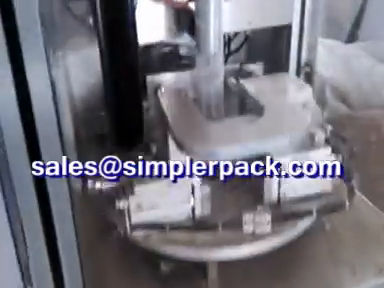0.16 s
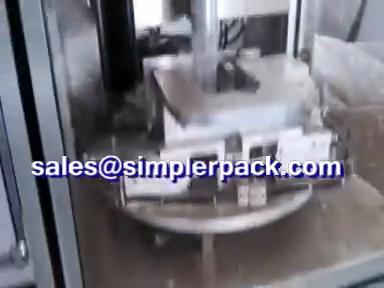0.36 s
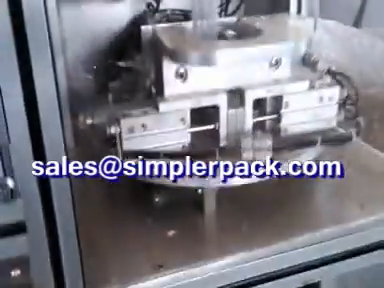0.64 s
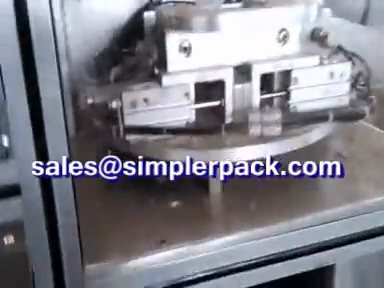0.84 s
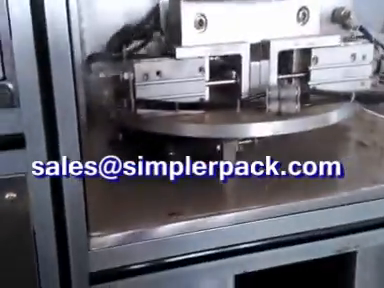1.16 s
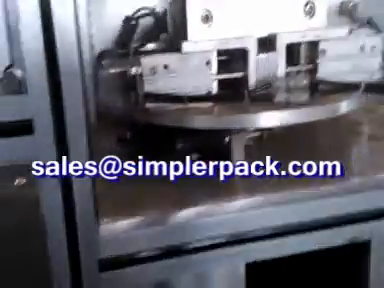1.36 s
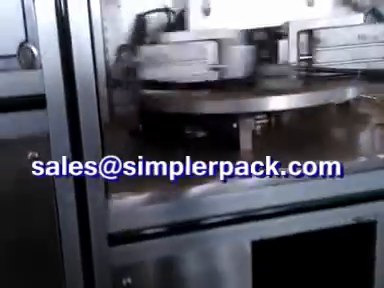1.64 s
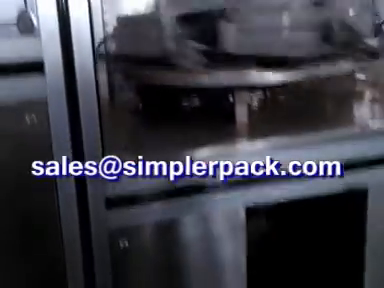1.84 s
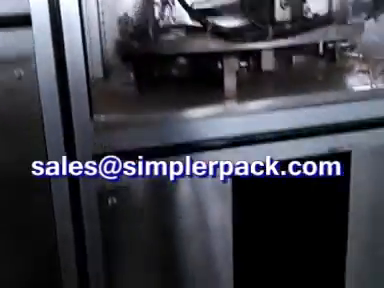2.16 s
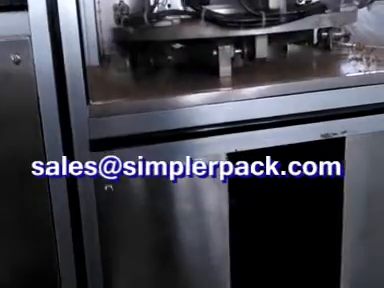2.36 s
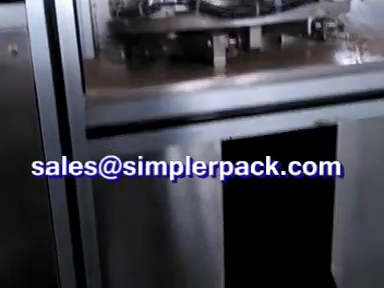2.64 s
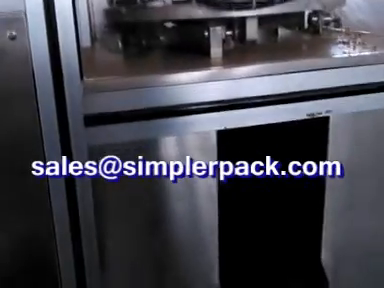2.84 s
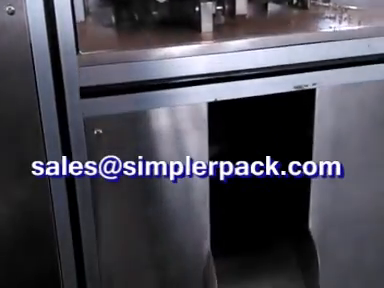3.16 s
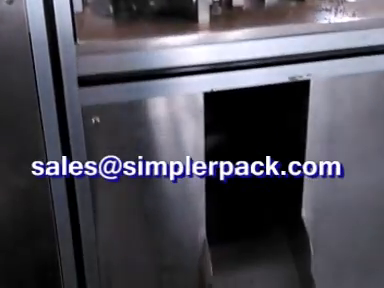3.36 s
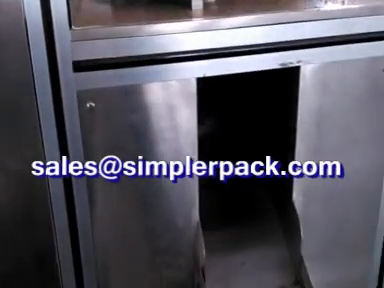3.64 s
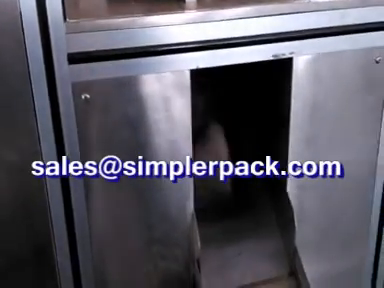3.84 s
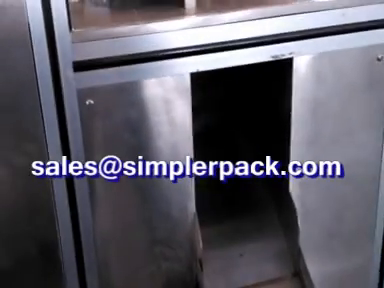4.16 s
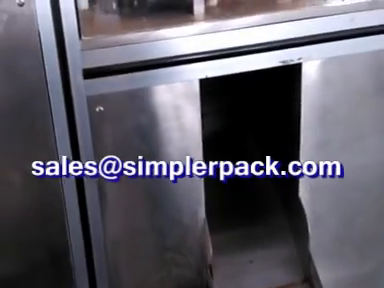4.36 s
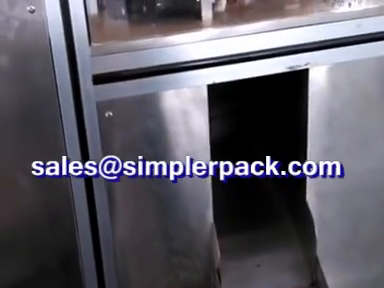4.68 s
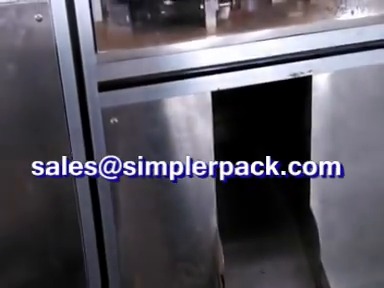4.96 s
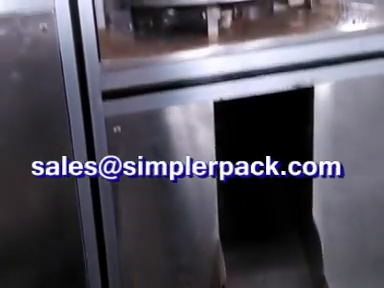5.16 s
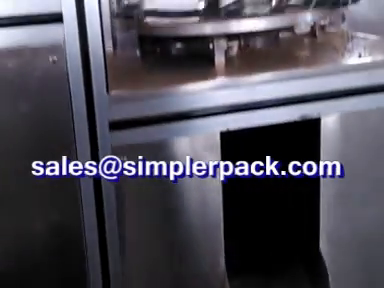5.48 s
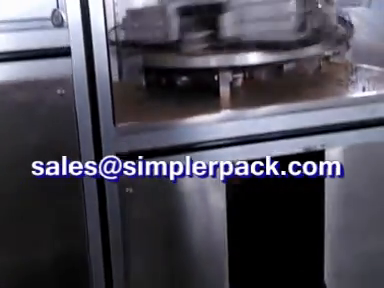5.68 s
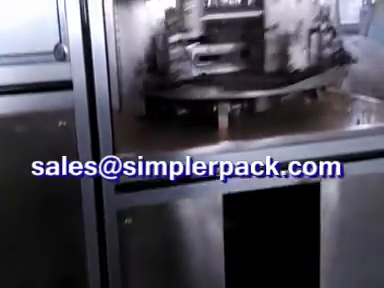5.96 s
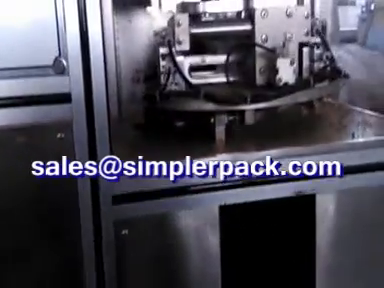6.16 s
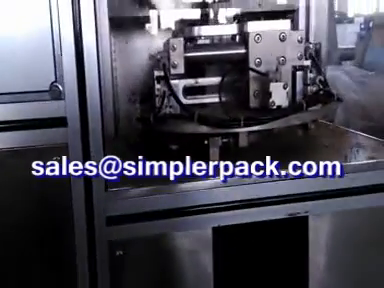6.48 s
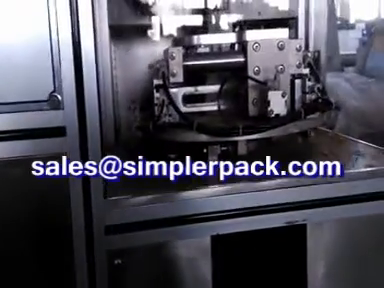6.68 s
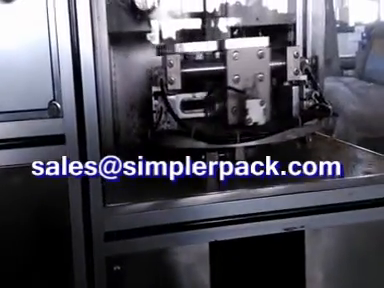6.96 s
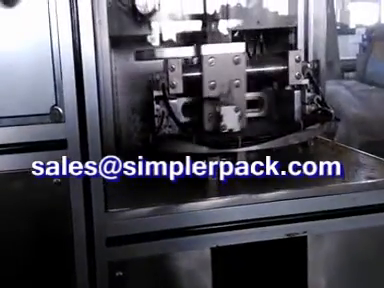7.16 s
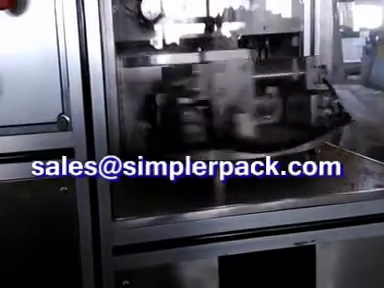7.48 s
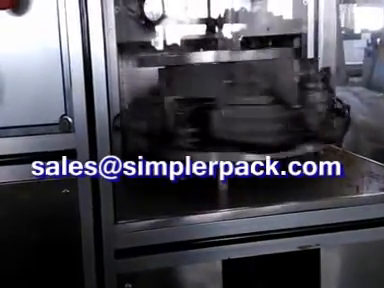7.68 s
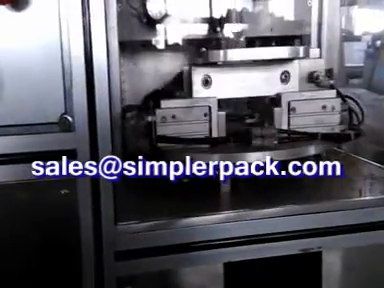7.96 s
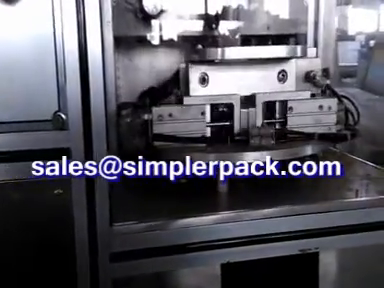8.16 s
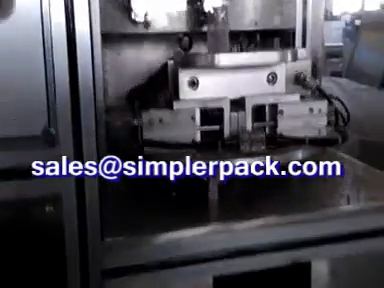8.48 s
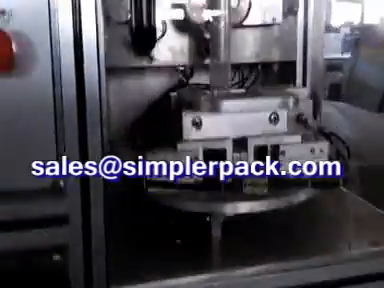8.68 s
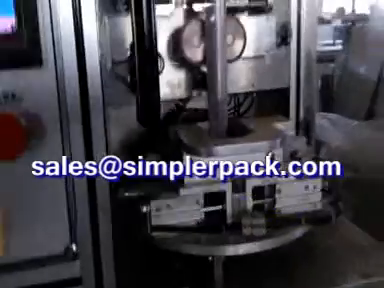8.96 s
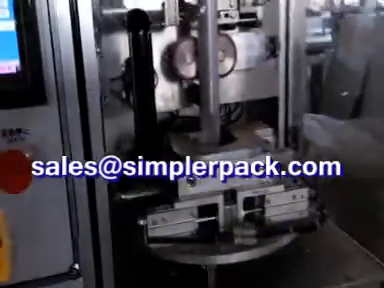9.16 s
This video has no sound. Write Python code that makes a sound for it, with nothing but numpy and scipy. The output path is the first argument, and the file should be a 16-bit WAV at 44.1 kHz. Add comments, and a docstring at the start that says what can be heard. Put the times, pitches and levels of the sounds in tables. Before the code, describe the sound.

Close to a packing machine on a factory floor, leaking air hisses steadily with a wavering high whistle. About every two seconds the pneumatic drive blasts air in spurts while its housing rattles and whines, then the exhaust dumps with a low puff, usually followed by a sharp latch click. The metal frame knocks and now and then squeals thinly. Moving air buffets the phone microphone throughout.

```python
"""A hissing, whistling air leak, close to a phone microphone at a packing machine on a factory floor.
Moving air buffets the microphone in low puffs and sets the cabinet humming. Every two seconds the
pneumatic drive runs: air blasts in spurts, the housing rattles and whines, then the exhaust dumps,
most times with a latch click. The frame knocks as the cylinders stop; now and then comes a thin squeal."""
import sys
import numpy as np
from scipy import signal
from scipy.fft import rfft, irfft, next_fast_len
from scipy.io import wavfile
from scipy.ndimage import uniform_filter1d

SR = 44100
rng = np.random.default_rng(int(sys.argv[2]) if len(sys.argv) > 2 else 0)


def generate_wav(signal):
    """Clip the signal to [-1, 1] and save it as 16-bit WAV at the path in sys.argv[1]."""
    frames = np.transpose(np.atleast_2d(signal))
    scaled = np.clip(frames, -1, 1) * 32767
    pcm = np.round(scaled).astype(np.int16)
    wavfile.write(sys.argv[1], SR, pcm)


N = 411440


def from_db(db):
    """Gain of a level in dB."""
    return 10 ** (np.asarray(db) / 20)


def rms_one(x):
    """x scaled to rms 1."""
    return x / np.sqrt(np.mean(x ** 2) + 1e-20)


def in_time(rows):
    """A curve of (seconds, value) rows, one value a sample."""
    return np.interp(np.arange(N) / SR, *np.transpose(rows))


def colour(x, points):
    """x filtered by a spectrum of (Hz, dB) points."""
    hz, level_db = np.transpose(points)
    size = next_fast_len(N)
    log_hz = np.log(np.maximum(np.fft.rfftfreq(size, 1 / SR), 1))
    gain = from_db(np.interp(log_hz, np.log(hz), level_db))
    return irfft(rfft(x, size) * gain, size)[:N]


def drift(rate_hz):
    """Random wander of spread 1: noise twice through a one-pole low-pass."""
    r = np.exp(-16 * np.pi * rate_hz / SR)
    slow = signal.lfilter([1], [1, -2 * r, r * r], rng.standard_normal(N // 8 + 4002))[4000:]
    return np.interp(np.arange(N) / 8, np.arange(len(slow)), rms_one(slow))


def resonate(x, peaks):
    """x through parallel resonances of alternating sign, scaled to rms 1."""
    out = np.zeros(len(x))
    for k, (hz, width, level_db) in enumerate(peaks):
        r = np.exp(-np.pi * width / SR)
        poles = [1, -2 * r * np.cos(2 * np.pi * hz / SR), r * r]
        ring = signal.lfilter([1 - r * r, 0, r * r - 1], poles, x)
        out += (-1) ** k * from_db(level_db) * ring / np.sqrt(width)
    return rms_one(out)


def add(track, start, sound):
    """Mixes a short sound in at a start in seconds."""
    i = max(round(start * SR), 0)
    track[i:i + len(sound)] += sound[:N - i]


def burst(length, edge):
    """A flat envelope with a quick rise and a fading end."""
    t = np.arange(round((length + 5 * edge) * SR)) / SR
    return (1 - np.exp(-t / (0.19 * edge))) * np.exp(-np.maximum(t - length, 0) / edge)


def peaked(phase):
    """A wave with pointed crests, as of a flap of air."""
    return 0.62 * np.cos(phase) + 0.12 * np.cos(2 * phase) + 0.035 * np.cos(3 * phase)


def rough_ring(length, hz, width_hz):
    """The envelope of a short burst, and as much noise rung twice through one sharp resonance."""
    envelope = burst(length, 0.0011 + 0.47 * length)
    peak = [(hz, width_hz, 0)]
    noise = rng.standard_normal(len(envelope) + 2000)
    return envelope, resonate(resonate(noise, peak), peak)[2000:]


# The leak's edge tone, close by. Each row: time in seconds, centre pitch in Hz.
WHISTLE_PITCH = [(0.0, 2540), (0.15, 2440), (0.33, 2680), (0.47, 2400), (0.72, 2430), (0.84, 2600),
                 (0.93, 2380), (1.09, 2680), (1.45, 2710), (1.75, 2650), (2.33, 2715), (2.95, 2420),
                 (3.1, 2540), (3.27, 2600), (3.55, 2590), (3.8, 2530), (3.93, 2370), (4.14, 2540),
                 (4.34, 2460), (4.75, 2400), (5.0, 2540), (5.5, 2530), (6.15, 2640), (6.31, 2400),
                 (6.75, 2450), (6.83, 2360), (6.95, 2470), (7.15, 2615), (7.9, 2460), (8.1, 2680),
                 (8.26, 2460), (8.91, 2550), (9.33, 2460)]
# Its second edge tone. The row: pitch in Hz, width in Hz, relative level in dB.
UPPER_WHISTLE = [(5860, 55, 0)]
# Breaks in the whistle. Each row: start in seconds, length in seconds.
WHISTLE_GAPS = [(2.265, 0.027), (2.978, 0.028), (3.542, 0.017), (4.189, 0.114), (4.932, 0.0097),
                (5.125, 0.081), (5.225, 0.017), (5.231, 0.011), (5.354, 0.0079), (5.393, 0.0097),
                (5.442, 0.012), (5.492, 0.018), (5.542, 0.024), (6.107, 0.013), (6.149, 0.017),
                (6.187, 0.016), (6.874, 0.035), (6.965, 0.0077), (7.01, 0.022), (7.048, 0.01),
                (7.511, 0.012), (7.548, 0.015), (8.047, 0.014), (8.13, 0.021), (8.72, 0.018),
                (8.846, 0.007), (9.005, 0.018)]
# The leak's hiss. Each row: frequency in Hz, relative density in dB.
HISS_SPECTRUM = [(40, -27), (100, -38), (250, -39), (500, -21.5), (850, -17), (1300, -14.5), (2200, -11),
                 (3100, -12), (5000, -12), (5850, -11.5), (7000, -12.5), (7600, -18), (8200, -14.5)]

def leak(blast, low_air, hiss_db=-29.5, whistle_db=-37, upper_db=-48):
    """Escaping air hisses and sounds two edge tones, which waver and break off now and then."""
    broken = np.zeros(N)
    for start, length in WHISTLE_GAPS:
        add(broken, start, np.ones(round(length * SR)))
    sag_db = -6 * uniform_filter1d(np.minimum(broken, 1), size=700)
    starved = blast / (blast + from_db(-34))   # blasts starve the leak: its tone stutters
    broken += drift(25) < 1.8 * starved - 2.2
    shaken = uniform_filter1d(np.abs(low_air), size=1500) / from_db(-24)
    broken += drift(40) < shaken - 2.2   # strong buffeting breaks it up too
    sounding = uniform_filter1d(1 - 0.9 * np.minimum(broken, 1), size=200)
    stirred = np.minimum(uniform_filter1d(np.abs(low_air), size=5000) / from_db(-37), 1)
    waver_hz = (18 + 30 * stirred) * drift(30) + (38 + 40 * stirred - 15 * starved) * drift(120)
    tone = np.sqrt(2) * np.sin(2 * np.pi * np.cumsum(in_time(WHISTLE_PITCH) + waver_hz) / SR)
    whistle = from_db(whistle_db + drift(68)) * tone
    upper = from_db(upper_db + 2 * drift(9.6)) * resonate(rng.standard_normal(N), UPPER_WHISTLE)
    hiss = rms_one(colour(rng.standard_normal(N), HISS_SPECTRUM))
    return sounding * (whistle + upper) + from_db(hiss_db + sag_db + 1.13 * drift(60)) * hiss


# Moving air at the microphone. Each row: time in seconds, level in dB.
DRAUGHT = [(0.0, -45.5), (0.41, -42.5), (0.85, -53.5), (1.3, -54.5), (1.4, -62.5), (1.74, -61),
           (1.9, -35.5), (2.15, -48.5), (2.38, -26.5), (2.47, -43.5), (2.65, -44.5), (3.0, -44.5),
           (3.1, -45), (3.29, -49.5), (3.35, -64), (3.45, -72.5), (3.48, -46), (3.8, -36.5), (4.15, -36),
           (4.3, -42), (4.75, -46), (4.8, -57.5), (5.05, -66), (5.5, -51), (5.85, -45.5), (6.02, -57),
           (6.2, -38.5), (6.6, -54.5), (6.76, -60), (6.97, -46), (7.15, -59.5), (7.36, -58), (7.42, -48),
           (7.8, -48), (8.2, -45), (8.9, -49.5), (9.33, -58.5)]
# The exhaust dump after each run. Each row: time of its peak in seconds, level in dB.
EXHAUSTS = [(0.99, -19), (3.039, -36), (4.909, -19.5), (6.872, -19.5), (8.809, -21)]
# Turbulence on the microphone. Each row: frequency in Hz, relative density in dB.
BUFFET_SPECTRUM = [(30, -40), (60, -7), (100, -2.5), (160, -2), (260, -18), (500, -32.5)]
# The frame's resonances. Each row: frequency in Hz, width in Hz, relative level in dB.
FRAME_MODES = [(231, 137, 8), (506, 186, 5.5), (743, 140, -2.5)]

def buffeting(running, idle_db=-52.5, run_db=-48.5, rise_s=0.02, fall_s=0.038, settle_s=0.13):
    """Draught and exhaust buffet the microphone, with puffs, frame rumble and the cabinet's answer."""
    t = np.arange(N) / SR
    wind = draught = from_db(in_time(DRAUGHT))
    shaking = from_db(idle_db) + from_db(run_db) * running
    for peak_s, level_db in EXHAUSTS:
        rising = (t - peak_s) / rise_s
        wind = wind + from_db(level_db) * np.exp(np.minimum(rising, (peak_s - t) / fall_s))
        shaking += from_db(level_db - 18) * np.exp(np.minimum(rising, (peak_s - t) / settle_s))
    lumps = from_db(2.6 * drift(20))
    buffet = rms_one(colour(lumps * rng.standard_normal(N), BUFFET_SPECTRUM))
    rumble = rms_one(lumps * from_db(2.5 * drift(45)) * resonate(rng.standard_normal(N), FRAME_MODES))
    pushes = wind * buffet + (shaking + from_db(-17) * wind) * rumble + puffs()
    return pushes + cabinet(draught, buffet, pushes)


# The cabinet's resonance. The row: frequency in Hz, width in Hz, relative level in dB.
CABINET_MODE = [(95.4, 12, 0)]
# Moments of steady hum. Each row: start in seconds, length in seconds, level in dB.
STEADY_HUMS = [(3.079, .22, -38), (3.47, .07, -34)]

def cabinet(draught, buffet, pushes, blown_db=-6.5, boom_db=-47.5, steady_hz=98):
    """The cabinet hums in the draught, twice holds a steady note, and booms along with low pushes."""
    hum = from_db(blown_db) * draught * resonate(buffet, CABINET_MODE)
    for start, length, level_db in STEADY_HUMS:
        swell = from_db(level_db) * burst(length, .012)
        add(hum, start, swell * 2 * peaked(2 * np.pi * steady_hz * np.arange(len(swell)) / SR))
    return hum + from_db(boom_db) * resonate(pushes, CABINET_MODE)


# Low puffs right on the microphone. Each row: start in seconds, level in dB, pitch in Hz.
PUFFS = [(0.039, -27, 104.5), (0.116, -24, 168), (0.36, -24, 123.3), (0.617, -20, 110), (0.669, -25, 188),
         (0.921, -16, 105), (0.961, -14, 193.4), (0.994, -9.5, 154.5), (1.017, -9.5, 151),
         (1.036, -7, 178.7), (1.136, -25.5, 263), (1.218, -25.5, 98.6), (1.301, -18.5, 100.5),
         (1.717, -31, 106), (1.809, -17.5, 102.8), (1.895, -14.5, 128), (1.96, -17.5, 94),
         (2.003, -17.5, 90), (2.073, -19, 128.5), (2.106, -14.5, 97.1), (2.214, -24.5, 98.6),
         (2.258, -5.5, 178.4), (2.323, -6.5, 112.5), (2.494, -16.5, 248), (2.546, -17, 96),
         (2.938, -14, 159), (3.004, -15.5, 131.6), (3.023, -17.5, 182.6), (3.047, -8, 109.6),
         (3.543, -11.5, 106.7), (3.665, -16.5, 109), (3.688, -19, 109), (3.807, -7.5, 147),
         (3.901, -15.5, 155.3), (3.939, -8.5, 108.7), (3.986, -12, 109.5), (4.164, -5.5, 112.2),
         (4.386, -22.5, 201.5), (4.881, -14.5, 225), (4.895, -6.5, 130), (4.922, -12, 138.4),
         (5.286, -26, 211.5), (5.773, -15.5, 120.5), (5.801, -17.5, 148.3), (5.87, -30, 151.5),
         (6.031, -26, 204), (6.058, -21, 105.6), (6.303, -17.5, 126), (6.79, -22, 123), (6.834, -20.5, 101),
         (6.87, -7, 136), (6.908, -16, 192), (7.377, -17.5, 96.2), (7.4, -25, 134.3), (7.523, -23, 121.4),
         (7.657, -26.5, 106.8), (7.856, -12, 109.3), (7.89, -24, 90), (8.439, -28.5, 140),
         (8.722, -14.5, 110), (8.753, -12, 104), (8.796, -13, 115.3), (8.834, -12.5, 110.4),
         (9.0, -26.5, 212), (9.285, -29, 132)]

def puffs():
    """Single flaps of air, each swelling and dying within a few cycles."""
    t, out = np.arange(round(.09 * SR)) / SR, np.zeros(N)
    for start, level_db, hz in PUFFS:
        rise_s = 0.0067 + 0.26 / hz   # lower puffs swell more slowly
        swell = t / rise_s * np.exp(1 - t / rise_s)
        flap = peaked(2 * np.pi * hz * t + rng.uniform(0, 2 * np.pi))
        add(out, start, from_db(level_db) * swell ** 2.9 * flap)
    return out


# Clunks in the frame. Each row: start in seconds, length in seconds, level in dB, ring pitch in Hz,
# the ring's share from 0 to 1.
CLUNKS = [(0.213, 0.011, -20, 590, 1), (0.234, 0.043, -23.5, 670, 0.45), (.427, 0.018, -24, 413, 0.88),
          (1.898, 0.021, -24, 281, 1), (2.258, 0.023, -14, 290, 0.34), (2.4, 0.027, -30, 278, 0.8),
          (2.55, 0.02, -29, 600, 0.5), (2.74, 0.069, -35.5, 527, 0.72), (2.943, 0.0082, -22, 625, .4),
          (4.184, 0.062, -21.5, 297, .4), (4.29, 0.13, -35.5, 506, 0.88), (4.84, 0.015, -30.5, 510, 1),
          (5.776, 0.023, -34, 353, 0.4), (6.11, 0.051, -23.5, 770, 0.37), (6.19, 0.03, -25.5, 500, 0.67),
          (6.68, 0.011, -33.5, 456, 0.96), (6.88, 0.0046, -15, 337, 0.95), (6.95, 0.012, -28.5, 384, 0.34),
          (7.52, 0.041, -39.5, 382, 0.57), (8.041, 0.023, -27, 685, 0.4), (8.124, 0.041, -27.5, 497, 0.66),
          (8.219, 0.025, -25, 462, 0.9), (8.27, 0.064, -33, 472, 0.89), (8.695, 0.04, -22.5, 752, 0.96)]
# The knock under each ring. Each row: frequency in Hz, relative density in dB.
KNOCK_SPECTRUM = [(80, -24), (200, 2), (500, -6.5), (900, -15), (1800, -27.5), (3000, -46.5)]

def frame_clunks():
    """A stopping cylinder strikes the frame: a broad knock with one rough ring."""
    knocking, out = colour(rng.standard_normal(N), KNOCK_SPECTRUM), np.zeros(N)
    for start, length, level_db, hz, share in CLUNKS:
        envelope, ring = rough_ring(length, hz, width_hz=84)
        knock = rms_one(knocking[round(start * SR):][:len(envelope)])
        add(out, start, from_db(level_db) * envelope * (share * ring + np.sqrt(1 - share ** 2) * knock))
    return out


# The drive's runs. Each row: start in seconds, length in seconds, lift of the blast's body in dB.
RUNS = [(0.36, 0.55, 2), (2.374, 0.61, 1.5), (4.29, 0.69, 1), (6.216, .6, -1.5), (8.135, 0.64, 0.5)]
# Spurts of air from the drive. Each row: start in seconds, length in seconds, blast level in dB.
SPURTS = [(0.395, 0.065, -30), (0.493, 0.04, -36.5), (0.59, 0.011, -25.5), (0.623, 0.021, -27.5),
          (0.677, 0.015, -33), (0.729, 0.091, -24), (0.832, 0.015, -32.5), (0.895, 0.018, -30.5),
          (2.404, 0.0038, -24.5), (2.494, 0.021, -22.5), (2.55, 0.022, -24.5), (2.662, 0.0094, -24),
          (2.737, 0.027, -38.5), (2.765, 0.035, -21), (2.807, 0.057, -24), (2.858, 0.058, -27),
          (2.937, 0.0067, -29), (4.304, 0.064, -20.5), (4.406, 0.055, -25), (4.469, 0.034, -23),
          (4.533, 0.019, -31), (4.565, 0.044, -23.5), (4.624, 0.051, -23.5), (4.689, 0.088, -28),
          (4.812, 0.037, -24), (6.217, 0.016, -28.5), (6.25, 0.11, -24), (6.354, 0.034, -21.5),
          (6.391, 0.03, -28.5), (6.457, 0.013, -27), (6.54, 0.064, -23.5), (6.629, 0.037, -27),
          (6.679, 0.015, -21), (6.711, 0.0098, -20), (6.797, 0.015, -25), (8.146, 0.057, -22),
          (8.212, 0.04, -17), (8.262, 0.071, -25.5), (8.332, 0.027, -23), (8.522, 0.0087, -28.5),
          (8.59, 0.028, -26), (8.695, 0.042, -27)]

def drive_cycle(run_blast_db=-32, run_rattle_db=-42.5, rattle_follows=0.23):
    """Envelopes of the drive: each run blows and rattles steadily, and spurts add to both."""
    running, body_db, blast, rattle = np.zeros((4, N))
    for start, length, lift_db in RUNS:
        add(running, start, burst(length, 0.0079))
        add(body_db, start, np.full(round(length * SR), lift_db))
    for start, length, blast_db in SPURTS:
        rattle_db = -35.5 + rattle_follows * (blast_db + 26)
        add(blast, start, from_db(blast_db) * burst(length, 0.0043))
        add(rattle, start, from_db(rattle_db) * burst(length, 0.0027))
    blast += from_db(run_blast_db) * running
    rattle += from_db(run_rattle_db) * running
    return running, body_db, blast, rattle


# The air blast at close range. Each row: frequency in Hz, relative density in dB.
BLAST_SPECTRUM = [(300, -37), (1000, -7.5), (2500, -0.5), (4500, 3), (5300, 11), (6400, 7), (7100, 14.5),
                  (7600, 10), (8300, 21)]
# Edges of the bands in which it gusts, in Hz.
BLAST_BANDS_HZ = [300, 1800, 3200, 4700, 6200, 8600]
# The drive housing's resonances. Each row: frequency in Hz, width in Hz, relative level in dB.
HOUSING_MODES = [(467, 150, -1.5), (986, 120, -2.5), (1448, 60, -1), (1920, 110, 3), (2530, 630, 3)]

def drive(body_db, blast, rattle, gust_db=1.5):
    """Air blasts out, each band gusting by itself, and the housing rattles along."""
    air, gusts = colour(rng.standard_normal(N), BLAST_SPECTRUM), np.zeros(N)
    for low, high in zip(BLAST_BANDS_HZ, BLAST_BANDS_HZ[1:]):
        band = signal.sosfilt(signal.butter(3, [low, high], "band", fs=SR, output="sos"), air)
        gusts += from_db(gust_db * drift(25) + body_db * (high < 6500)) * band
    housing = resonate(rng.standard_normal(N), HOUSING_MODES)
    jet = blast * from_db(1.2 * drift(60)) * rms_one(gusts)
    return jet + rattle * from_db(2.2 * drift(30)) * housing


# Latch clicks. Each row: start in seconds, level in dB.
CLICKS = [(1.044, -19), (4.9657, -6), (6.9162, -20), (8.8463, -7.5)]
# The latch's modes. Each row: frequency in Hz, relative level in dB, seconds to fall by 60 dB.
LATCH_MODES = [(4180, -20, .035), (5065, -2, .024), (5230, -1, .011), (5370, -6, .04), (5800, -16, .07),
               (6400, -14, .03), (6950, -18, .028), (7420, -18, .04)]

def latch(bounce_s=.0042):
    """Each click is a short snap that rings the latch's modes, with a quick bounce."""
    t, out = np.arange(round(.08 * SR)) / SR, np.zeros(N)
    attack = 1 - np.exp(-(t / .0006) ** 2)
    for (start, level_db), phases in zip(CLICKS, rng.uniform(0, 1, (len(CLICKS), len(LATCH_MODES)))):
        ring = sum(from_db(db - 60 * t / t60) * np.sin(2 * np.pi * hz * t + phase)
                   for (hz, db, t60), phase in zip(LATCH_MODES, phases))
        snap = .14 * np.diff(rng.standard_normal(len(t) + 2), 2) * np.exp(-t / .004)
        click = from_db(level_db) * (ring + snap) * attack
        add(out, start, click)
        add(out, start + bounce_s, .4 * click)
    return out


# Squeals. Each row: start in seconds, length in seconds, level in dB, pitch in Hz, resonance width in Hz.
SQUEALS = [(1.903, 0.02, -31, 6620, 150), (1.898, 0.025, -33, 7000, 200), (4.21, .075, -41, 4880, 40),
           (6.95, .12, -47, 4850, 40)]

def squeals():
    """The frame squeals thinly: short bursts of noise in one high, narrow resonance each."""
    out = np.zeros(N)
    for start, length, level_db, hz, width_hz in SQUEALS:
        envelope, ring = rough_ring(length, hz, width_hz)
        add(out, start, from_db(level_db) * envelope * ring)
    return out


# Flickering stereo spread in the treble, as an audio coder leaves it.
# Each row: frequency in Hz, side against mid at its widest in dB.
TREBLE_SPREAD = [(600, -105), (1400, -65), (2100, -39), (3700, -58.5), (4300, -19.5), (6500, 0.5),
                 (8300, -22.5)]

def scene():
    """The machine stands close and centred; only the treble spreads, and that spread flickers."""
    running, body_db, blast, rattle = drive_cycle()
    low_air = buffeting(running)
    mid = low_air + leak(blast, low_air) + drive(body_db, blast, rattle)
    mid += latch() + frame_clunks() + squeals()
    flicker = np.clip(3 * drift(9) + 0.39, 0, 1)
    side = colour(flicker * np.roll(mid, 900), TREBLE_SPREAD)
    return np.array([mid + side, mid - side])


def record(dry, cutoff_hz=8700):
    """The phone's small microphone loses deep bass; its voice channel rolls off near 8 kHz, then cuts."""
    voice = signal.sosfilt(signal.ellip(6, .5, 31, 7550, fs=SR, output="sos"), dry)
    voice = signal.sosfilt(signal.butter(2, 45.0, "high", fs=SR, output="sos"), voice)
    return signal.sosfilt(signal.cheby2(14, 60, cutoff_hz, fs=SR, output="sos"), voice)


dry = scene()
out = record(dry)
generate_wav(out)
```